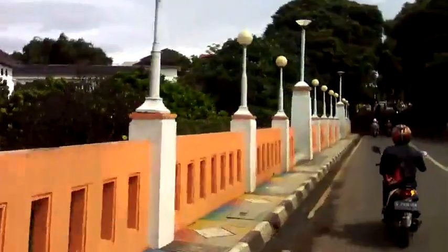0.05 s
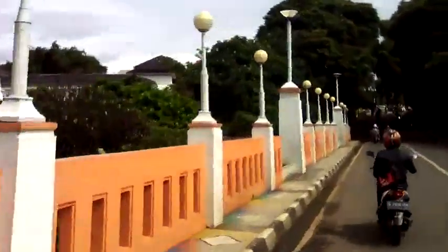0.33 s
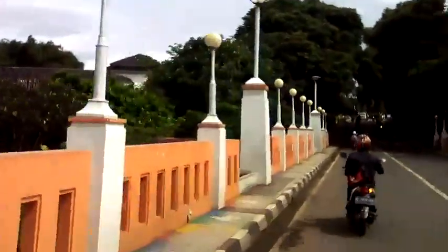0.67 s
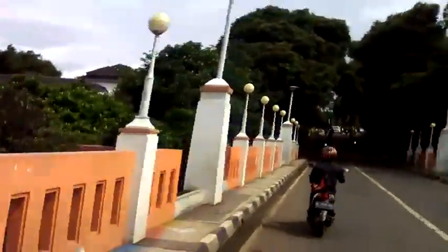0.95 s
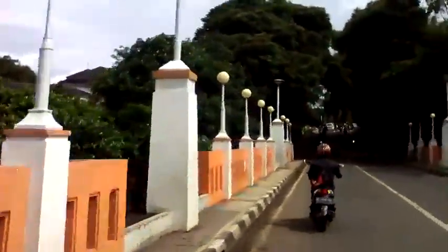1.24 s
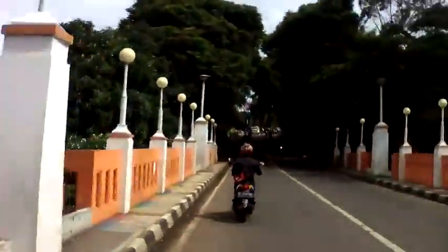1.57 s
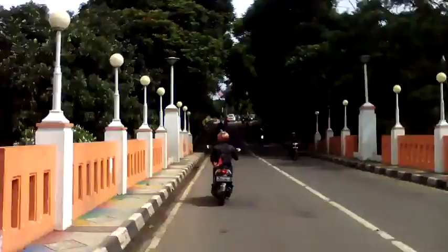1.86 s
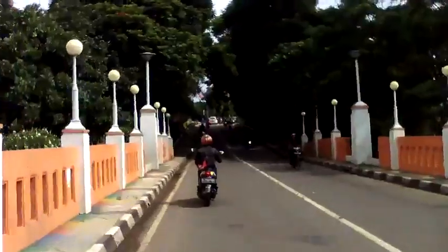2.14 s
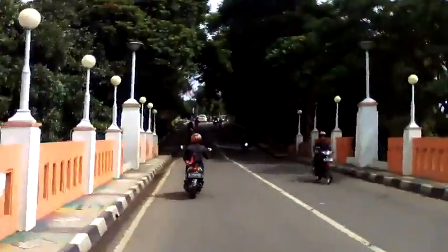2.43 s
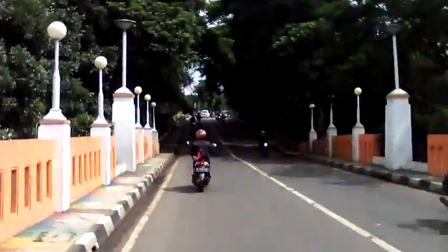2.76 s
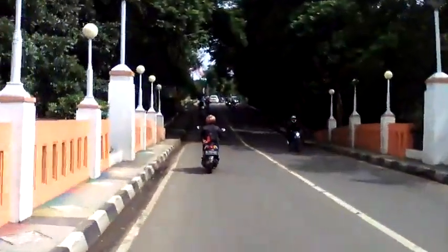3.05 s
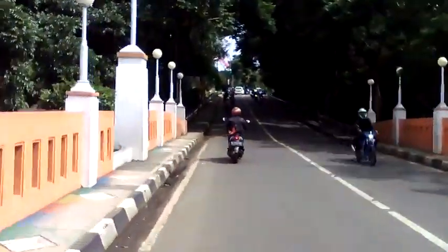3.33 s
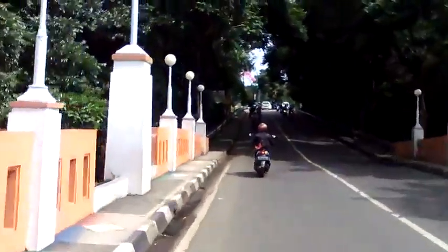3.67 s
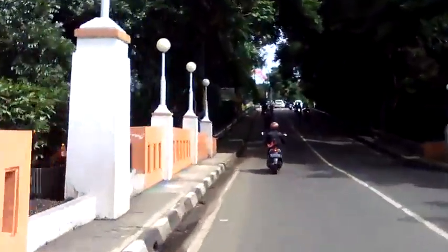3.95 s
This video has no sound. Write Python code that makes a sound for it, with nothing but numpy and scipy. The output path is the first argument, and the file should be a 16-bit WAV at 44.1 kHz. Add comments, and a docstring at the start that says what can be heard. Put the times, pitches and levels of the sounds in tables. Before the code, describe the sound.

Wind thumps and flutters on a moving microphone, with tyre noise farther off.

```python
"""Wind buffets a small mono microphone, out in the airstream on a ride over a bridge among scooters.
Gusts of turbulence hit it, brighter as they get harder; single eddies slap the port, a fine fizz
rides on both, and large swirls rumble below. Two brief rattles cut through. Farther off lies the
steady roar of tyres and traffic. The recorder rounds off the hardest peaks."""
import sys
import numpy as np
from scipy import signal
from scipy.fft import rfft, irfft, next_fast_len
from scipy.io import wavfile
from scipy.ndimage import uniform_filter1d, map_coordinates

SR = 44100
rng = np.random.default_rng(int(sys.argv[2]) if len(sys.argv) > 2 else 0)


def persist_wave(psi):
    """Save psi, clipped to +-1, as 16-bit WAV."""
    counts = np.round(np.clip(psi, -1, 1) * 32767).astype(np.int16)
    wavfile.write(sys.argv[1], SR, np.atleast_2d(counts).T)


N = 176400
TIME = np.arange(N) / SR


def amp(db):
    """Decibels to gain."""
    return 10 ** (np.asarray(db) / 20)


def unit(x):
    """Scale to rms 1."""
    return x / np.sqrt(np.mean(x ** 2) + 1e-20)


def along(points, hz):
    """Join (Hz, value) points on a log frequency axis."""
    freqs, values = np.transpose(points)
    return np.interp(np.log(hz + 1), np.log(freqs + 1), values)


def curve(points):
    """Join (seconds, value) points, one value per sample."""
    return np.interp(TIME, *np.transpose(points))


def wobble(rate):
    """A smooth random curve of rms 1, with rate knots a second."""
    return unit(map_coordinates(rng.standard_normal(N // 16), [TIME * rate], mode="wrap"))


def filtered(x, gain):
    """Apply a gain that depends on frequency."""
    size = next_fast_len(N + 8192)
    return irfft(rfft(x, size) * gain(np.fft.rfftfreq(size, 1 / SR)), size)[:N]


def noise(spectrum):
    """Noise of rms 1, coloured by (Hz, dB) points."""
    return unit(filtered(rng.standard_normal(N), lambda hz: amp(along(spectrum, hz))))


def causal_pulse(spectrum_db, size):
    """The minimum-phase pulse with this spectrum."""
    cepstrum = irfft(np.log(amp(spectrum_db)))
    cepstrum[1:size // 2] *= 2
    cepstrum[size // 2 + 1:] = 0
    return irfft(np.exp(rfft(cepstrum)))


# Gusts right on the microphone. Each row: start and length in seconds, level in dB, extra edge in dB.
GUSTS = [(0.0, 0.015, -14.5, 8.5), (0.029, 0.039, -22.5, -40), (0.299, 0.058, -19, -8),
         (0.365, 0.03, -12.5, -9), (0.408, 0.057, -20.5, 4.5), (0.468, 0.095, -20, -4),
         (0.748, 0.055, -22.5, 10.5), (0.812, 0.078, -19, -3), (0.899, 0.093, -18, 2.5),
         (1.006, 0.079, -20, -1), (1.107, 0.026, -17, -11), (1.188, 0.063, -15.5, 12),
         (1.265, 0.032, -17, -4), (1.457, 0.15, -21.5, -6), (1.633, 0.079, -19.5, -1),
         (1.74, 0.025, -20, -8), (1.849, 0.06, -20.5, -11), (2.056, 0.033, -16, -2), (2.113, 0.023, -20, 1),
         (2.268, 0.13, -23, 6.5), (2.387, 0.05, -22.5, 4), (2.453, 0.036, -20, 8.5),
         (2.526, 0.015, -19, 9.5), (2.649, 0.11, -19, 11.5), (2.779, 0.019, -18, 2),
         (2.919, 0.021, -19.5, 6.5), (2.967, 0.073, -19.5, 8.5), (3.056, 0.05, -24.5, 13),
         (3.137, 0.053, -22, -3), (3.186, 0.172, -24.5, 3), (3.364, 0.066, -19.5, 11),
         (3.43, 0.041, -18.5, -14), (3.48, 0.045, -22.5, 6), (3.565, 0.063, -24, -19),
         (3.665, 0.016, -19, -6), (3.856, 0.043, -23, -2), (3.919, 0.031, -19, -1),
         (3.949, 0.039, -24.5, 5)]
# Their dull body and bright edge. Each row: frequency in Hz, relative level in dB.
BODY_SPECTRUM = [(20, -46), (60, -19.5), (120, -6), (200, 1.5), (310, 3.5), (500, -1.5), (750, -4),
                 (1100, -14), (1700, -28.5), (3000, -70), (6000, -90)]
EDGE_SPECTRUM = [(200, -61), (600, 4), (1000, 4), (1700, -1.5), (2300, -12.5), (3200, -22.5), (4000, -39),
                 (5000, -26.5), (8000, -43), (15000, -43)]

def gusts():
    """Each gust rises, holds and dies; eddies shake its dull body and, more strongly, its bright edge."""
    attack_s, release_s = 0.0022, 0.014
    breeze_db, full_db = -29.5, -11  # between gusts; at full strength
    edge_growth, edge_share_db = 1.5, -14.5  # the edge outgrows the body; its share at full strength
    eddies_per_s, flutter_limit_db = 330, 9
    body_power = np.full(N, amp(breeze_db) ** 2)
    edge_power = np.full(N, amp(full_db + edge_growth * (breeze_db - full_db)) ** 2)
    for start, length, db, extra_db in GUSTS:
        rise = np.clip((TIME - start) / attack_s + .5, 0, 1)
        dying_s = np.maximum(TIME - start - length + release_s / 2, 0)
        envelope = rise * np.exp(-dying_s / release_s)
        edge_db = full_db + edge_growth * (db - full_db) + extra_db
        body_power += (amp(db) * envelope) ** 2
        edge_power += (amp(edge_db) * envelope ** edge_growth) ** 2
    flutter_db = flutter_limit_db * np.tanh(wobble(eddies_per_s) / 2)
    body = np.sqrt(body_power) * unit(amp(flutter_db)) * noise(BODY_SPECTRUM)
    edge = np.sqrt(edge_power) * unit(amp(edge_growth * flutter_db)) * noise(EDGE_SPECTRUM)
    return body + amp(edge_share_db) * edge


# Eddies striking the microphone port. Each row: start in seconds, pulse peak in dB, treble lift in dB.
SLAPS = [(.014, -4.5, -1), (.024, -3.5, -7), (.05, -9.5, -30), (0.101, -9, -20), (.107, -5, -32),
         (.35, -12, -10), (.379, -22, -7), (.427, -4, -18), (0.501, -7.5, -14), (.533, -6.5, 2),
         (.694, -8, -14), (.759, -8, -1), (.79, -7, -9), (.827, -9, -16), (.835, -9, -21),
         (.854, -5.5, -24), (.886, -9, -10), (0.929, -14, -10), (.939, -3, 4), (1.039, -7, -5),
         (1.056, -13.5, -16), (1.066, -7.5, -18), (1.079, -9.5, -12), (1.129, -7.5, -8), (1.195, -4, 13),
         (1.216, -2.5, 0), (1.232, -11, 9), (1.24, -13, 14), (1.266, -7, -5), (1.29, -4.5, -1),
         (1.482, -8, -4), (1.518, -10.5, -14), (1.551, -6, -5), (1.587, -7, -30), (1.625, -8.5, 0),
         (1.64, -9.5, 1), (1.67, -9, -10), (1.694, -4, -9.5), (1.743, -9.5, 8), (1.75, -6.5, -14),
         (2.053, -9.5, -2), (2.129, -13.5, -12), (2.179, -7, -9.5), (2.262, -10, -5), (2.327, -5.5, -3.5),
         (2.464, -9.5, -5), (2.551, -9, -16), (2.6, -11, -4), (2.616, -9, -1), (2.626, 1, -0.5),
         (2.644, -5, 10), (2.649, -7.5, 0), (2.668, -6.5, -11), (2.678, -8.5, 1), (2.711, -9, -2),
         (2.784, -10, -4), (2.984, -6, 4), (3.026, -9.5, 1.5), (3.143, -2, -18), (3.16, -10.5, -4),
         (3.381, -8.5, -3), (3.398, -8.5, 7), (3.498, -10, -4), (3.511, -10, -14), (3.891, -2, -4.5),
         (3.928, -10.5, 5)]
# The tone of a slap. Each row: frequency in Hz, relative level in dB.
SLAP_SPECTRUM = [(25, -52.5), (150, -2.5), (350, 1), (600, 2), (1000, 0), (1700, -10), (2700, -23),
                 (3800, -40), (5000, -35.5), (8000, -48), (15000, -49)]

def slaps(size=2048):
    """One pressure pulse per eddy, with a short ragged wake of smaller eddies behind it."""
    wake_decay_s, wake_db = 0.0046, -23.5
    hz = np.fft.rfftfreq(size, 1 / SR)
    treble_shelf = along([(600, 0), (1800, 1)], hz)
    out = np.zeros(N + size)
    for start, db, treble_db in SLAPS:
        push = amp(wake_db) * rng.standard_normal(size) * np.exp(-TIME[:size] / wake_decay_s)
        push[0] = 1  # the eddy itself, ahead of its wake
        pulse = causal_pulse(along(SLAP_SPECTRUM, hz) + treble_db * treble_shelf, size)
        pulse /= np.abs(pulse).max()
        out[round(start * SR):][:size] += amp(db) * signal.fftconvolve(push, pulse)[:size]
    return out[:N]


# Fizz, close on the microphone. Each row: frequency in Hz, relative level in dB.
FIZZ_SPECTRUM = [(1500, -58), (3200, 8), (3900, -3), (4600, 7.5), (5500, -11.5), (6500, -6), (7400, 0.5),
                 (7800, -14), (8400, 2), (10000, -11), (11200, -2), (11700, -16), (12400, -2), (13700, -13),
                 (15200, -6.5)]

def fizz(wind, level_db=-54.5, growth=0.97):
    """Fine treble noise that crackles with every peak of the buffeting."""
    wind_rms = np.sqrt(np.abs(uniform_filter1d(wind ** 2, size=60)))
    return amp(level_db) * unit(wind_rms ** growth) * noise(FIZZ_SPECTRUM)


# Low swirls around the microphone. Each row: time in seconds, level in dB.
RUMBLE_LEVELS = [(0, -43), (.28, -40.5), (.37, -27.5), (.7, -41.5), (1.03, -24.5), (1.12, -46), (1.58, -32),
                 (1.68, -32), (1.8, -32.5), (2.5, -37.5), (3.55, -37), (3.76, -41), (3.95, -23.5)]
# Their tone. Each row: frequency in Hz, relative level in dB.
RUMBLE_SPECTRUM = [(15, -40), (25, -19), (38, -18), (55, -2.5), (90, 1), (130, 2.5), (250, -55), (600, -75)]

def rumble():
    """Slow, large swirls of air swell and sink in the bass."""
    return amp(curve(RUMBLE_LEVELS)) * noise(RUMBLE_SPECTRUM)


# Rattles heard through the wind. Each row: midpoint in seconds, pitch there in Hz, peak in dB.
RATTLES = [(.667, 1483, -18), (3.023, 1840, -24.5)]

def rattles(half_length_s=0.0038, rise_hz_per_s=33000, phase_step_rad=0.064):
    """A few milliseconds of rough, rising tone, as from a loose part."""
    roughness = np.cumsum(phase_step_rad * rng.standard_normal(N))
    out = np.zeros(N)
    for midpoint, hz, db in RATTLES:
        t = TIME - midpoint
        cycles = (hz + rise_hz_per_s * t / 2) * t
        envelope = np.exp(-(t / half_length_s) ** 2)
        out += amp(db) * envelope * np.sin(2 * np.pi * cycles + roughness)
    return out


# Road roar and tyre hiss, farther off on the bridge. Each row: frequency in Hz, relative level in dB.
ROAR_SPECTRUM = [(25, -20), (70, -20.5), (150, 6), (300, 0), (500, -3), (700, -20.5), (950, -8.5),
                 (1300, -16), (1900, -19.5), (2500, -32.5), (3500, -80)]
HISS_SPECTRUM = [(800, 1), (2200, 3.5), (3400, -0.5), (3950, -4.5), (4700, -4.5), (6500, -9), (9000, -12),
                 (12000, -13.5), (15500, -21)]
# Tyre hiss as it reaches the microphone. Each row: time in seconds, level in dB.
HISS_LEVELS = [(0, -55), (.22, -48.5), (.6, -54), (1.4, -54), (2.2, -54), (2.85, -51), (3.27, -50.5),
               (3.4, -48), (3.57, -51.5), (4, -48.5)]

def traffic():
    """The road roars, tyre hiss swells as a scooter passes, and a narrow whirr of traffic draws near."""
    roar_db, waver_db = -28, 0.58
    whirr_hz, width_hz, end_db, rise_db_per_s = 3140, 540, -50.5, 36
    roar = amp(roar_db + waver_db * wobble(rate=7.32)) * noise(ROAR_SPECTRUM)
    whirr = filtered(rng.standard_normal(N), lambda hz: np.exp(-((hz - whirr_hz) / width_hz) ** 2))
    approach_db = end_db + rise_db_per_s * (TIME - N / SR)
    hiss = amp(curve(HISS_LEVELS)) * noise(HISS_SPECTRUM)
    return roar + hiss + amp(approach_db) * unit(whirr)


def scene():
    """Wind on the microphone up front, the bridge traffic behind it."""
    wind = gusts() + slaps()
    return (wind + fizz(wind) + rumble() + traffic() + rattles())[None]


def record(dry):
    """The recorder overloads softly; the microphone's low cut and a band limit follow."""
    ceiling, knee = .76, 6
    low_cut_hz, top_hz = 27, 15600
    rounded = dry[0] / (1 + np.abs(dry[0] / ceiling) ** knee) ** (1 / knee)
    return filtered(rounded, lambda hz: (hz < top_hz) * hz ** 2 / np.hypot(hz ** 2, low_cut_hz ** 2))[None]


dry = scene()
out = record(dry)
persist_wave(out)
```